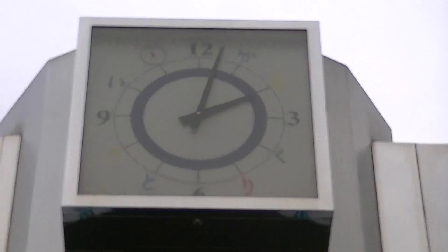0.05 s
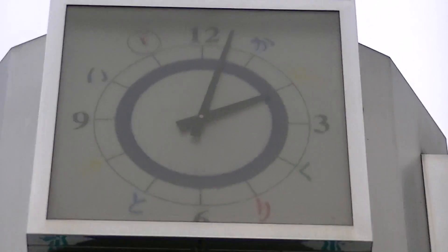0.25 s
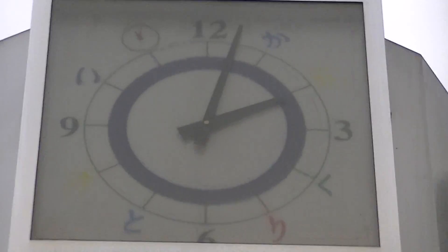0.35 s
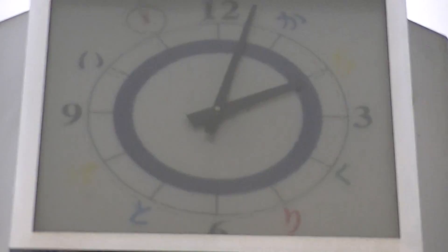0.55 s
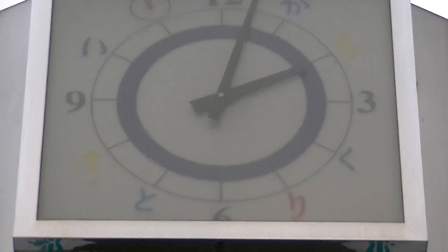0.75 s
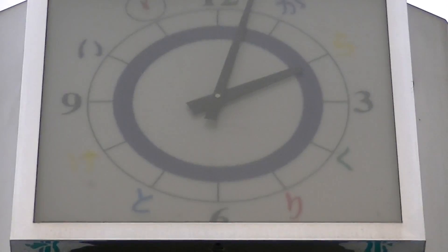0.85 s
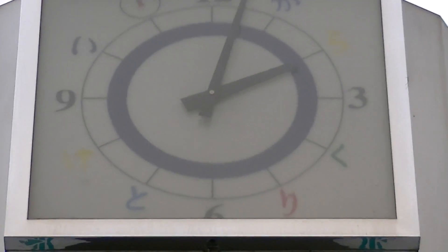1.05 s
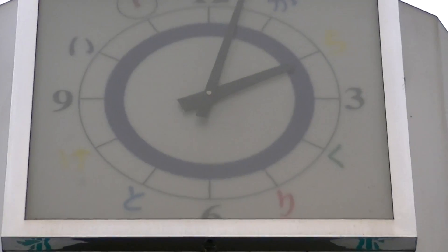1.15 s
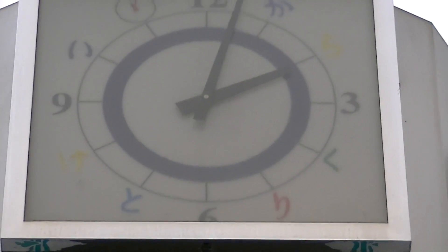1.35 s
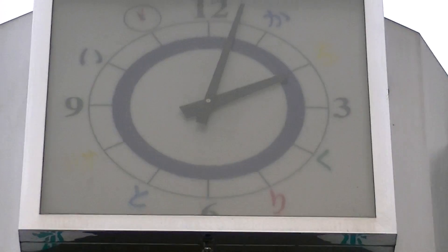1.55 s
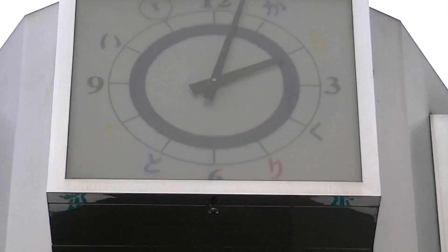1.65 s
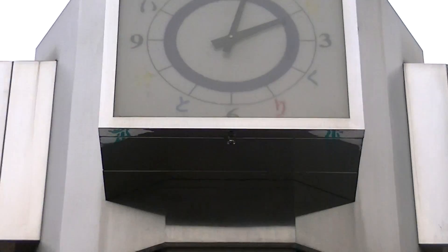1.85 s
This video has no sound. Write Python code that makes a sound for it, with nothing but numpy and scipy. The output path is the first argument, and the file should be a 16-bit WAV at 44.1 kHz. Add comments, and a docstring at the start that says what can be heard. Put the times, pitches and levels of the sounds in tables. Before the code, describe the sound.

Sharp plastic clicks and small creaks come from a hand-held camera's zoom lever and case, right at the microphone. The zoom motor hisses faintly at the start and end, a finger knocks dully, and distant traffic rushes steadily outdoors.

```python
"""Distant traffic rushes throughout, heard from a hand-held camera aimed at an outdoor clock.
At first the zoom motor hisses faintly through the lens barrel, stopping near 0.4 s.
From 0.2 s the zoom lever and plastic case click and creak right at the microphone, each slip
ringing the case. The motor runs again from 1.6 s; near 1.8 s a finger knocks dully on the case."""
import sys
import numpy as np
from scipy import signal
from scipy.io import wavfile

SR = 44100
rng = np.random.default_rng(int(sys.argv[2]) if len(sys.argv) > 2 else 0)


def file_out(sig):
    """Save sig as 16-bit WAV at sys.argv[1]."""
    # one column per channel
    cols = np.atleast_2d(sig).T
    # limit, then scale
    lim = np.clip(cols, -1, 1)
    pcm = np.round(lim * 32767).astype(np.int16)
    wavfile.write(sys.argv[1], SR, pcm)


N = 83790

# Far traffic. Each row: frequency in Hz, relative spectral density in dB.
TRAFFIC_SPECTRUM = [(25, -43), (80, -46), (125, -38), (160, -31.5), (200, -20.5), (320, -10), (480, -2.5),
                    (700, 0), (920, 2), (1250, -4.5), (1800, -6), (2800, -13.5), (4000, -20.5), (6300, -28),
                    (10000, -40), (15500, -49)]
# Traffic's stereo width. Each row: frequency in Hz, side minus mid in dB.
TRAFFIC_WIDTH = [(70, 4), (150, -13), (400, -23), (1500, -22), (6000, -16), (13000, -17)]
# Motor runs. Each row: start in seconds, end in seconds, level in dB.
ZOOM_RUNS = [(-.1, 0.435, -61.5), (1.556, 2.0, -61.5)]
# Lens barrel resonances. Each row: frequency in Hz, bandwidth in Hz, relative gain in dB.
BARREL_MODES = [(3370, 270, 5), (4550, 310, 4.5), (5550, 280, 2), (6300, 350, -0.5), (7300, 1200, -4),
                (7670, 400, -0.5), (8660, 420, -8)]
# Lever and case clicks. Each row: start in seconds, level in dB re CONTACT_DB,
# then drive in dB at each of the six DRIVE_HZ.
CASE_CLICKS = [(0.2245, 1, -1.5, -0.5, -9.5, -0.5, 2, -2.5), (0.3353, -27.5, -4, -4, -4, 1, -2, 9),
               (0.3594, -16, 3, 1, -2, 3, -1, 2), (0.3667, -9.5, 3.5, -10, 5.5, 5.5, 1, -13),
               (0.3705, -17.5, -4, 0, 2, 0, 1, 1), (0.3857, -15, 4, 2, -13, 5, -7, 3),
               (0.3880, 3, 0, 2.5, 1, 2.5, 7, 4.5), (0.725, -28, 4, 2, -3, 2, -11, 9),
               (0.791, -18, -6, -4.5, 8, 1, 7.5, 6.5), (0.8020, -27, 7, 3, -1, -5, -12, -6),
               (0.838, -24, 8, 7, 6, -2, -12, -11), (0.8428, -30, 6, -3, 6, -2, -7, -5),
               (0.8501, -18, 6, 6.5, 3.5, -3, 2, -13), (0.8576, -23, 7, 5, 4, -5, -7, -9),
               (0.9077, -24.5, 3, 1.5, -4, -6, -0.5, 1), (0.9318, -29, 8, 0, -4, 5, -7, 1),
               (0.969, -22, -6, 5.5, 0, 1.5, 1, -2), (1.0042, -28, -11, 7, 7, -7, -1, -1),
               (1.1277, -27, -10, 10, 6.5, -6, -3, 1), (1.1315, -27.5, -8, 3, 1, -1, -3, -3),
               (1.1869, -32.5, -4, 2, -1, 5, -3, -1), (1.2493, -26, 2.5, 0, 3, 2.5, -1, 1),
               (1.3928, -10.5, 3, 2.5, -3, -7.5, 4, 2.5), (1.4921, -22.5, 7, 1.5, -7, 6.5, -5, -10.5),
               (1.4947, -29.5, 1, -6, -1, 2, -2, 5), (1.5307, -31, -17, -2, 1, 4, -1, 10),
               (1.7938, -26.5, -16, 1, -3, 6, -2, 2), (1.7981, -21.5, -8, -6, 2.5, 3.5, 1, 3.5)]
# Points of a click's drive curve. Each entry: frequency in Hz.
DRIVE_HZ = [1730, 2680, 4050, 4770, 6160, 8240]
# Case resonances. Each row: frequency in Hz, bandwidth in Hz, relative gain in dB.
CASE_MODES = [(966, 240, -11.5), (1257, 230, -9), (1500, 200, -5.5), (1886, 220, 2), (2250, 505, -1.5),
              (2754, 300, 3), (3660, 252, 2), (4032, 313, 1), (4590, 270, -2.5), (4970, 420, -4.5),
              (5760, 620, -5.5), (6177, 413, -6), (6960, 400, -10.5), (8210, 700, -19), (9610, 600, -22),
              (11100, 2400, -33), (15000, 1300, -32)]
# Finger knocks. Each row: start in seconds, level in dB re CONTACT_DB.
FINGER_KNOCKS = [(1.7864, -19.5), (1.7953, -14)]
# Lower case resonances. Each row: frequency in Hz, bandwidth in Hz, relative gain in dB.
KNOCK_MODES = [(555, 120, 7), (810, 400, 6), (2640, 910, 0), (3820, 250, -3.5)]
# Resonances where the two microphone ports differ. Each row: frequency in Hz, bandwidth in Hz, gain in dB.
PORT_MODES = [(2980, 260, -9.5), (3280, 260, -7.5), (4840, 460, -14.5), (13000, 2200, -18)]

CONTACT_DB = 8.5


def from_db(db):
    """Decibels to gain."""
    return 10 ** (np.asarray(db) / 20)


def unit_rms(x):
    """Scale to unit power."""
    return x / np.sqrt(np.mean(x ** 2) + 1e-20)


def unit_energy(x):
    """Scale to unit energy."""
    return x / np.sqrt(np.sum(x ** 2) + 1e-20)


def at_hz(curve, hz):
    """Interpolate on a log-frequency axis."""
    points_hz, values = np.array(curve).T
    return np.interp(np.log(hz), np.log(points_hz), values)


def butter(x, hz, kind, order=2):
    """Butterworth filter."""
    return signal.sosfilt(signal.butter(order, np.minimum(hz, .45 * SR), kind, fs=SR, output="sos"), x)


def resonate(x, modes):
    """Parallel resonances, alternating in sign."""
    out = 0
    for k, (hz, width_hz, db) in enumerate(modes):
        radius = np.exp(-np.pi * width_hz / SR)
        poles = [1, -2 * radius * np.cos(2 * np.pi * hz / SR), radius ** 2]
        gain = (-1) ** k * from_db(db) * (1 - radius ** 2) / 2
        out = out + gain * signal.lfilter([1, 0, -1], poles, x)
    return out


def stereo(mid, side):
    """Mid and side to left and right."""
    return np.array([mid + side, mid - side])


def add(out, start_s, sound):
    """Mix in a short stereo sound."""
    i = int(start_s * SR)
    out[:, i:i + sound.shape[1]] += sound[:, :N - i]


def burst(t60_s, samples=3000):
    """Decaying noise of unit energy."""
    return unit_energy(rng.standard_normal(samples) * from_db(-60 * np.arange(samples) / SR / t60_s))


def traffic(level_db=-47, waver_db=0.57):
    """Distant tyre noise in third-octave bands, each wavering slightly."""
    edges_hz = 20 * 2 ** (np.arange(30) / 3)
    white = rng.standard_normal((2, 2, N + SR))
    out = 0
    for k, (low_hz, high_hz) in enumerate(zip(edges_hz, edges_hz[1:])):
        mid, side = butter(white[k % 2], [low_hz, high_hz], "band")[:, SR:]
        centre_hz = np.sqrt(low_hz * high_hz)
        waver = np.interp(np.linspace(0, 1, N), np.linspace(0, 1, 20), rng.standard_normal(20))
        gain = from_db(at_hz(TRAFFIC_SPECTRUM, centre_hz) + waver_db * waver)
        side_gain = from_db(at_hz(TRAFFIC_WIDTH, centre_hz))
        out = out + gain * stereo(mid, side_gain * side)
    return from_db(level_db) * unit_rms(out)


def zoom_motor(ramp_s=0.022, side_db=-22, top_hz=10100):
    """Gear hiss through the barrel while the lens travels."""
    t = np.arange(N) / SR
    envelope = sum(from_db(db) * np.clip(np.minimum(t - start_s, end_s - t) / ramp_s + .5, 0, 1)
                   for start_s, end_s, db in ZOOM_RUNS)
    mid, side = rng.standard_normal((2, N))
    hiss = resonate(stereo(mid, from_db(side_db) * side), BARREL_MODES)
    return envelope * unit_rms(butter(hiss, top_hz, "low", order=4))


def contact(chatter_db=-9, shiver_db=-9.5, shiver_top_hz=5000, gap_s=0.0008, side_db=-22.5):
    """Contact force: a snap, then micro-slips and shivering loose parts; the ports differ slightly."""
    chatter = from_db(chatter_db) * burst(t60_s=0.0082)
    shiver = from_db(shiver_db) * butter(burst(t60_s=0.034), shiver_top_hz, "low", order=1)
    force = np.concatenate([[1], np.zeros(int(gap_s * SR)), chatter + shiver])[:len(chatter)]
    return stereo(force, from_db(side_db) * burst(t60_s=0.0087))


def clicks(low_hz=780, top_at_0_db_hz=11300, top_hz_per_db=115):
    """Slips ring the case. The spot that slips weights the modes; gentler slips are duller."""
    out = np.zeros((2, N))
    for start_s, db, *drive_db in CASE_CLICKS:
        drive = list(zip(DRIVE_HZ, drive_db))
        modes = [(hz, width_hz, mode_db + at_hz(drive, hz)) for hz, width_hz, mode_db in CASE_MODES]
        top_hz = max(top_at_0_db_hz + top_hz_per_db * db, low_hz)
        ring = butter(resonate(contact(), modes), low_hz, "high")
        ring = butter(ring, top_hz, "low", order=4)
        add(out, start_s, from_db(db + CONTACT_DB) * unit_energy(ring))
    return out


def knocks(band_hz=(350, 6000)):
    """A soft finger rings the lower case modes."""
    out = np.zeros((2, N))
    for start_s, db in FINGER_KNOCKS:
        ring = butter(resonate(contact(), KNOCK_MODES), band_hz, "band")
        add(out, start_s, from_db(db + CONTACT_DB) * unit_energy(ring))
    return out


def scene():
    """Close camera noises over far traffic."""
    return clicks() + knocks() + zoom_motor() + traffic()


def record(dry, balance_db=0.21, cutoff_hz=15900):
    """The two ports ring a little differently, the right is more sensitive; the top is cut."""
    mismatch = stereo(0, resonate(dry.mean(axis=0), PORT_MODES))
    ports = (dry + mismatch) * from_db([[-balance_db], [balance_db]])
    return signal.sosfilt(signal.ellip(10, .1, 80, cutoff_hz, fs=SR, output="sos"), ports)


dry = scene()
out = record(dry)
file_out(out)
```